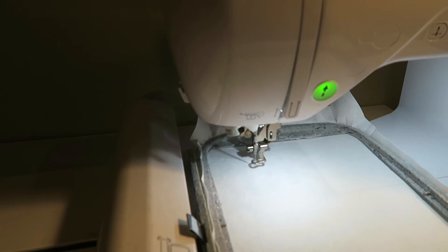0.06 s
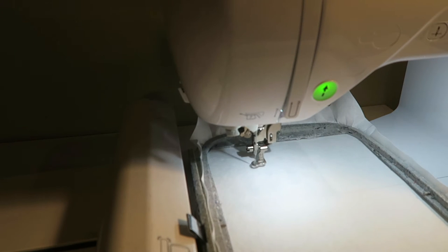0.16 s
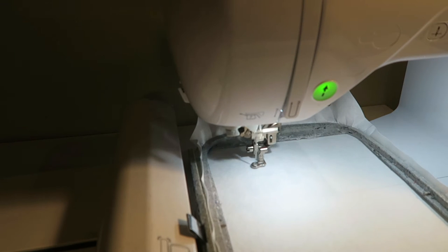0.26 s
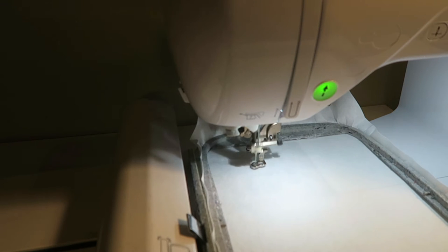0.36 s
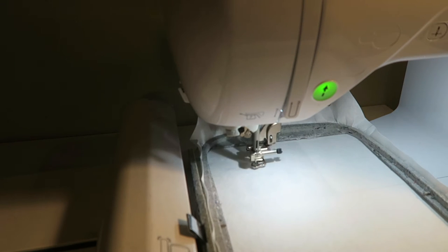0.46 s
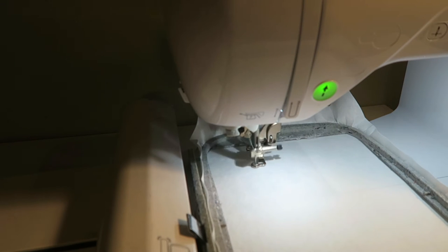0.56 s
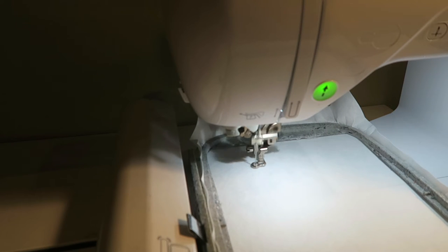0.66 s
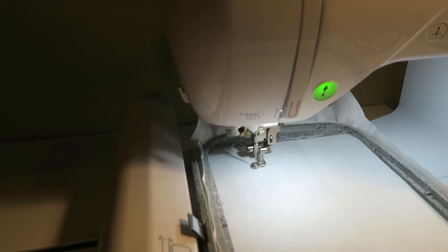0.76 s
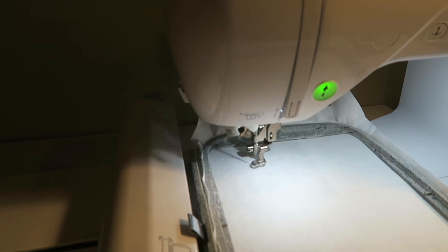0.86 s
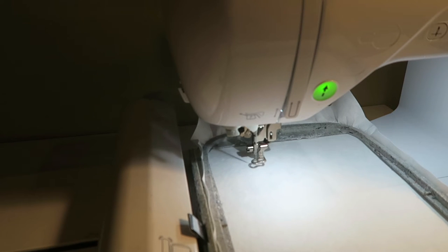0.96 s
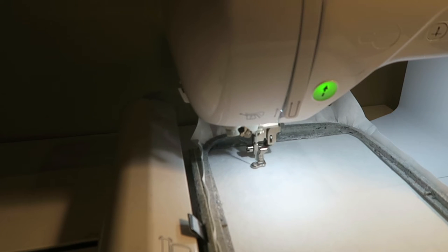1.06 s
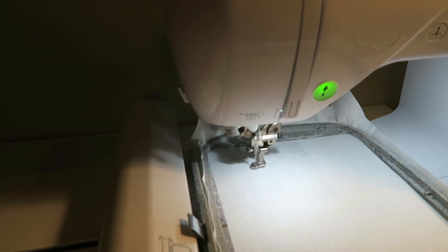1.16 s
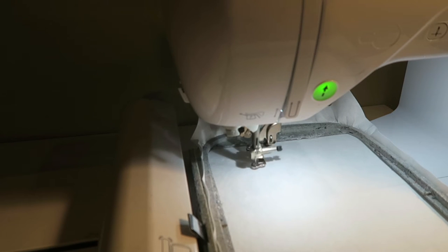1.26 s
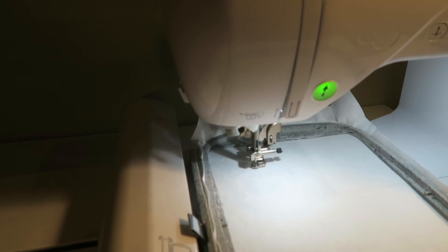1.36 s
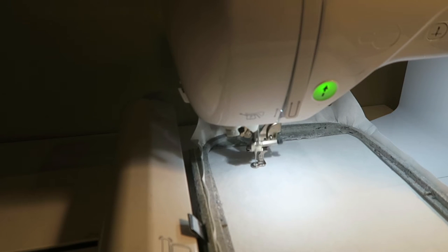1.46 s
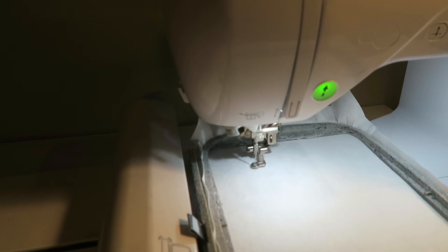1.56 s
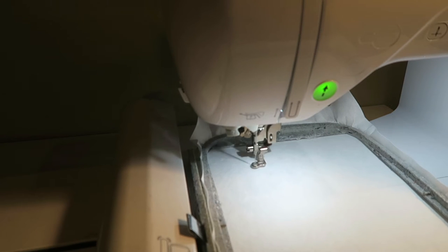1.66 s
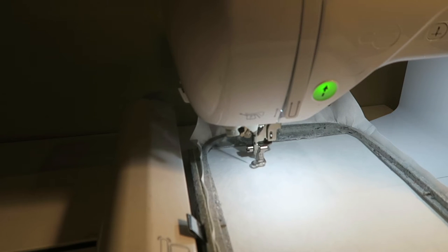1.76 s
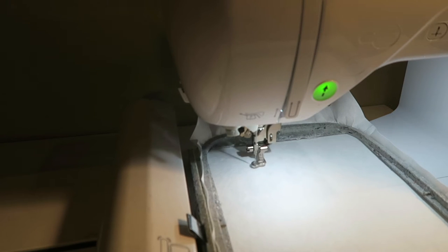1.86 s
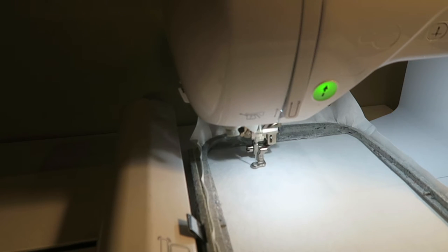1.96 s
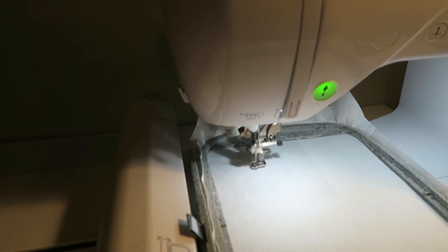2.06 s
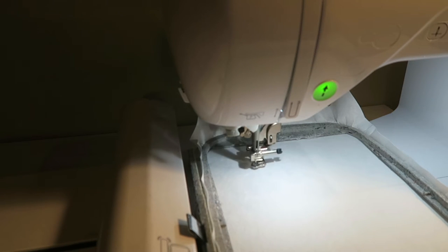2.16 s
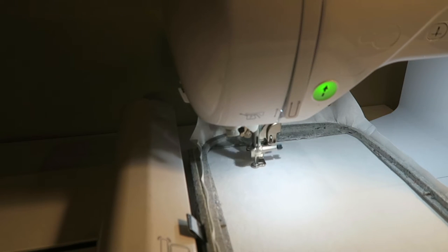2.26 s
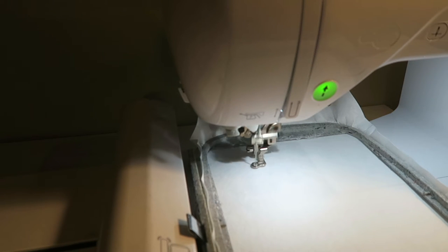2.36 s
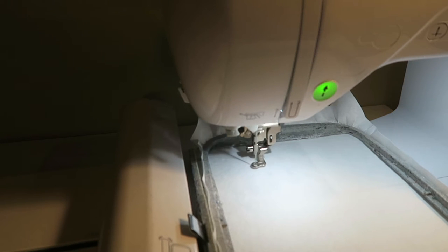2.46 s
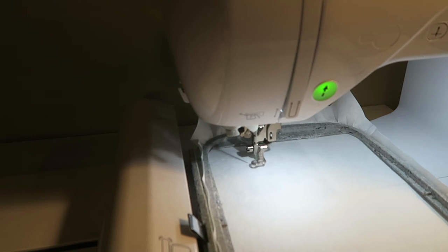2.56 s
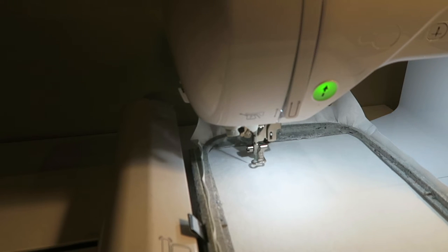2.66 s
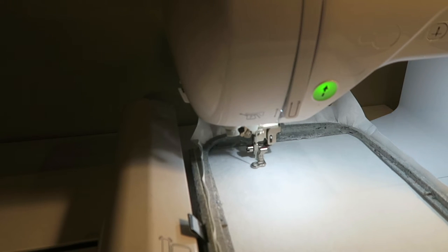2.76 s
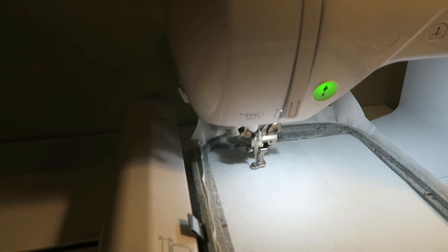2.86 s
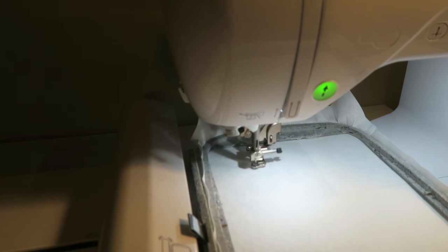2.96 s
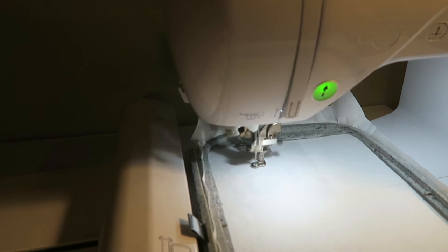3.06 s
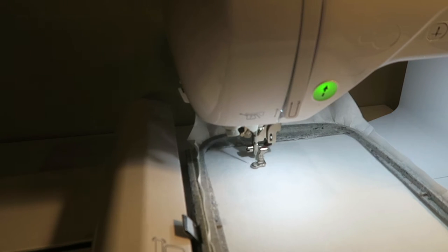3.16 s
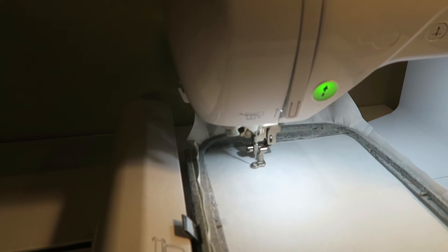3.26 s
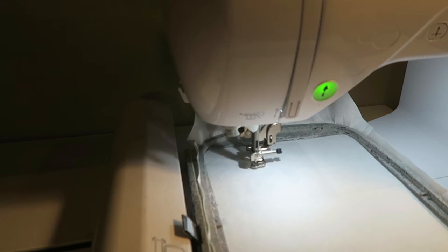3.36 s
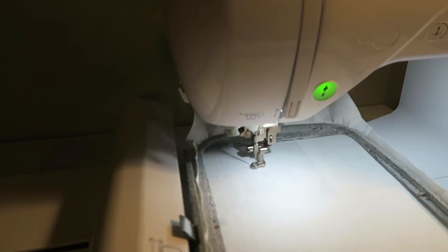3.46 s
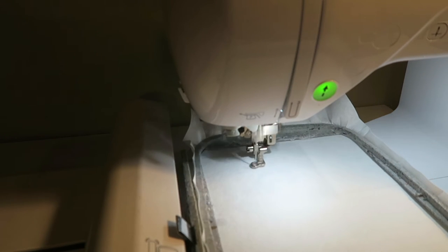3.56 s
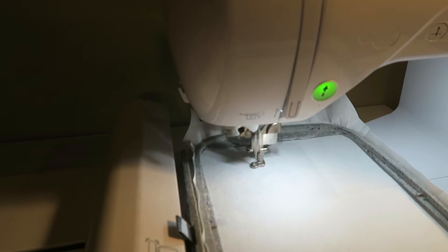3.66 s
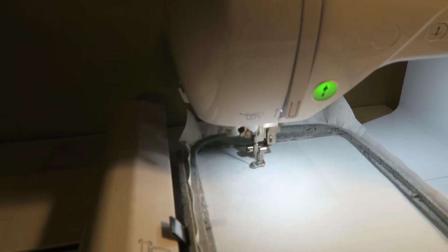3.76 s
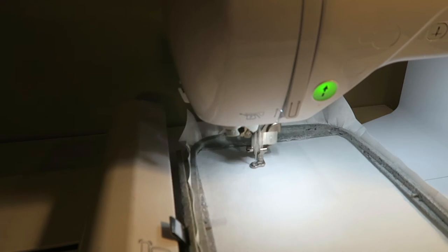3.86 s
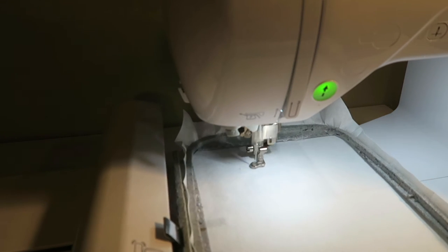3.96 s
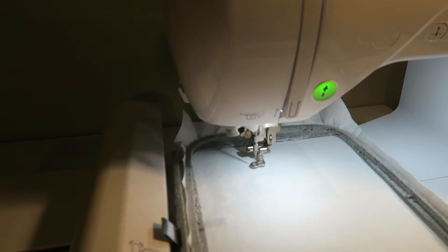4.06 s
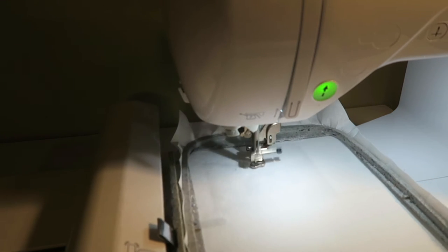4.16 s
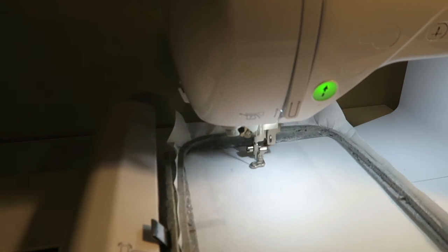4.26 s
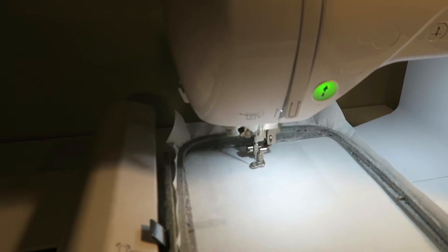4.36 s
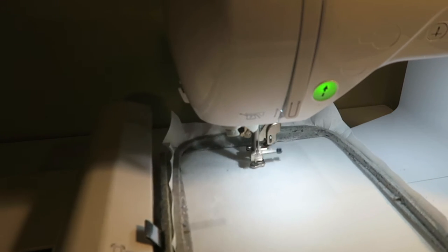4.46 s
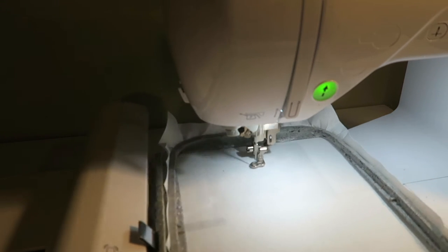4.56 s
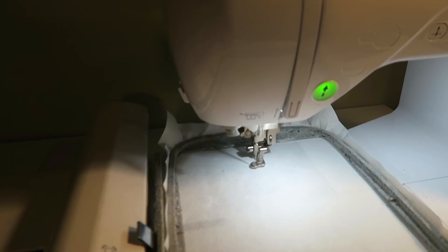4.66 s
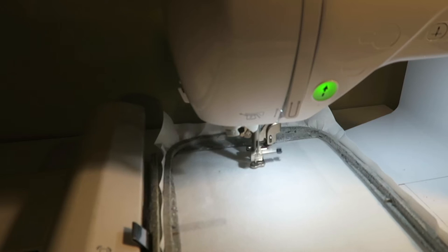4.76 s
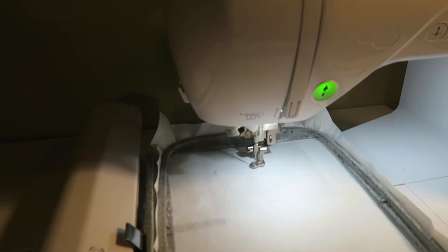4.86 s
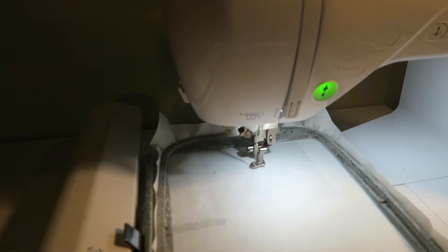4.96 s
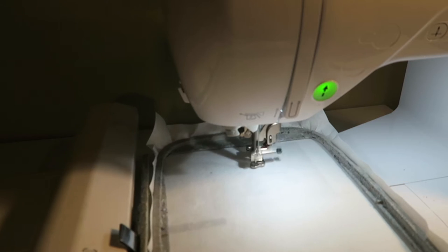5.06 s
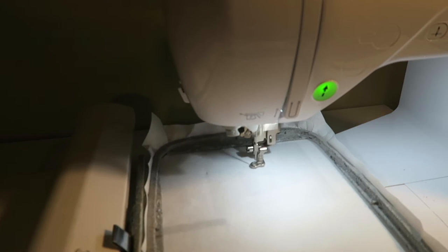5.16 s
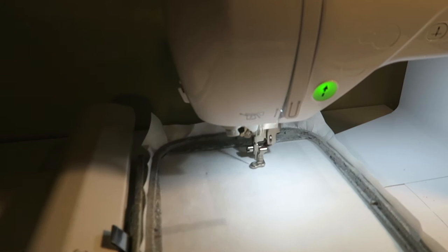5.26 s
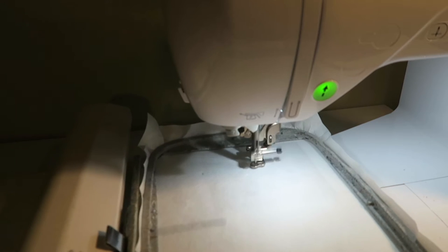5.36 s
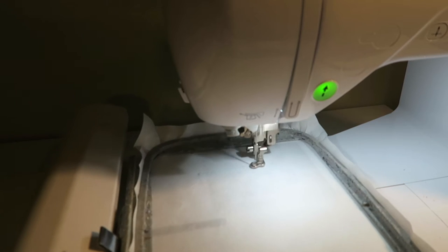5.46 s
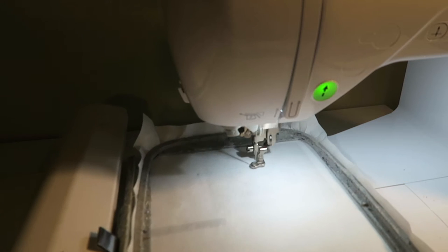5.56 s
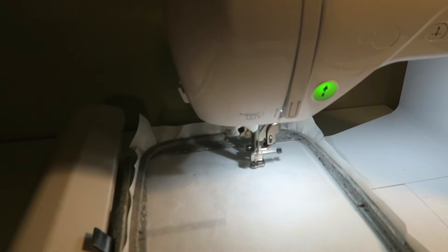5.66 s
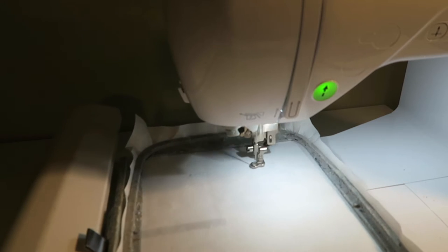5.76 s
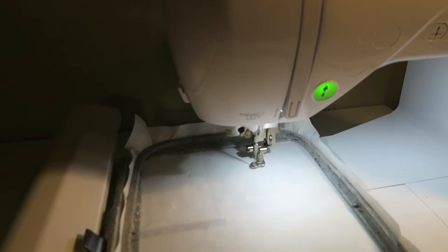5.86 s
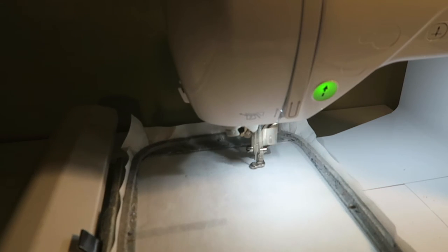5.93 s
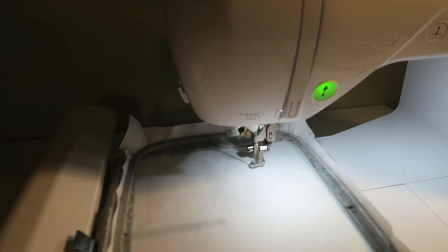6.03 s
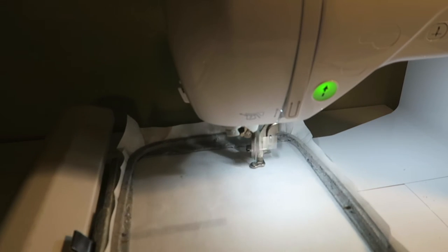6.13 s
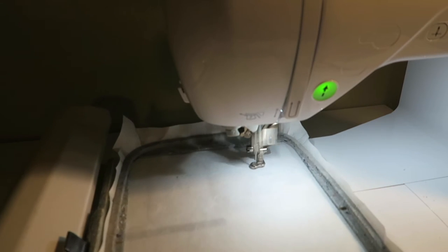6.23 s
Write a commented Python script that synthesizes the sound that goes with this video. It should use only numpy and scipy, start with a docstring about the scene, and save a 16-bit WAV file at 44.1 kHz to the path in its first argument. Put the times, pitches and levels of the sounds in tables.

```python
"""An embroidery machine, close by in a small room: four slow stitches, then it speeds up to an even run.
At each stitch the hoop carriage jerks off and jolts to a stop; these impacts excite the modes of the
casing and the table and rattle loose parts, while the carriage motor hums. Thread swishes by friction
and snaps tight, the steel hook clinks and small parts tick. Underneath, the shaft motor whirs, and it
whines as it gathers speed."""
import sys
import numpy as np
from scipy import signal
from scipy.fft import rfft, irfft, next_fast_len
from scipy.io import wavfile
from scipy.ndimage import uniform_filter1d

SR = 44100
rng = np.random.default_rng(int(sys.argv[2]) if len(sys.argv) > 2 else 0)


def persist_wave(psi):
    """Save psi, clipped to +-1, as 16-bit WAV."""
    counts = np.round(np.clip(psi, -1, 1) * 32767).astype(np.int16)
    wavfile.write(sys.argv[1], SR, np.atleast_2d(counts).T)


N = 277609

# Carriage strokes, one a shaft turn: (start [s], jerk level [dB], travel time [s], jolt level [dB])
STITCHES = [(-0.04, 3, 0.032, -18.5), (0.806, 4.5, 0.032, -20.5), (1.658, 3.5, 0.028, -21.5),
            (2.506, 5, 0.03, -19), (3.213, -1.5, 0.063, -8.5), (3.544, 0, 0.065, -9.5),
            (3.782, -1, 0.058, -9), (3.978, -3, 0.059, -13.5), (4.146, -3, 0.055, -14.5),
            (4.303, -5.5, 0.059, -13.5), (4.455, -5, 0.051, -20.5), (4.6, -8, 0.059, -14.5),
            (4.753, -6.5, 0.061, -13.5), (4.9, -6.5, 0.058, -12), (5.053, -6, 0.06, -18.5),
            (5.202, -6, 0.056, -18), (5.352, -5.5, 0.062, -14.5), (5.504, -5, 0.055, -17),
            (5.654, -2.5, 0.055, -16.5), (5.801, -4.5, 0.062, -15), (5.95, -3.5, 0.058, -16.5),
            (6.102, -3.5, 0.053, -15.5), (6.253, -6, 0.054, 0)]
# Spectrum of loose parts rattling in the casing: (frequency [Hz], relative level [dB])
RATTLE_SPECTRUM = [(18, -56), (30, -16.5), (114, -4), (156, -2.5), (213, 0.5), (359, -0.5), (432, 4),
                   (1170, -11), (1290, -13), (1820, -23), (4090, -31.5), (12300, -66.5), (15500, -105)]
# Stitch rates: slow, table thump at its fullest, jerk and jolt start to blur together, fast
SLOW_PER_S, THUMP_PER_S, BLUR_PER_S, FAST_PER_S = 1.17, 2.8, 4.5, 6.67


def carriage():
    """Inertia: loose parts rattle against the casing as the carriage jerks off and jolts to a stop."""
    bass_env, treble_env, hiss_env = np.zeros((3, N))
    t = np.arange(N) / SR
    for (start, jerk_db, travel, jolt_db), period in zip(STITCHES, turns()[1]):
        rate, stop = 1 / period, start + travel
        rise = by_speed((.009, .003), rate)
        settling = undb(-60 * np.clip(t - stop - .022, 0, None) / 1.3)
        jerk = burst(start - .004, rise + .00016, by_blur((.22, .67), rate)) * settling
        bass_env += undb(jerk_db) * jerk
        # belt slack is taken up with a clack; at speed the treble of the jerk comes late
        clack = by_speed((.51, .067), rate) * burst(start, rise, .11)
        lag = by_blur((0, .007), rate)
        treble_env += undb(jerk_db - 27.5) * (np.roll(jerk, int(lag * SR)) + clack)
        hiss_env += undb(jerk_db - 12.5) * burst(start - .003 + lag, rise, by_speed((.15, .2), rate))
        # the treble of the jolt starts just ahead of the stop
        t60, lead = by_speed((.16, .066), rate), by_blur((.012, .02), rate)
        bass_env += undb(jolt_db) * burst(stop - .003, .005, t60, hold=.024)
        shaken = burst(stop - lead, .01, t60, hold=lead + .0058)
        shaken *= undb(jolt_db + by_blur((-19.5, -19), rate))
        treble_env += shaken
        hiss_env += undb(by_blur((-5, -2), rate)) * shaken
    bass = lowpass(bass_env * grit(scatter_db=-1.5, rate_hz=380), 1100)
    grains = grit(scatter_db=2.6, rate_hz=500)
    treble = lowpass(highpass(treble_env * grains, 1820), 8200) + highpass(hiss_env * grains, 8200)
    force = colour(undb(-12) * bass + undb(23.5) * treble, RATTLE_SPECTRUM)
    body = casing(force, direct_db=-1.98)
    return undb(by_thump((-22, -3.5), speed())) * lowpass(body, 195) + highpass(body, 195)


def knocks():
    """Impact excitation: jerks and stops ring casing and table and click steel; at speed a lever taps."""
    # Resonances of the table: (frequency [Hz], level [dB], T60 [s])
    table_modes = [(53.3, -3, 0.22), (96, -4, 0.093), (121.4, -0.5, 0.16)]
    blows, table_force, clicks, taps = np.zeros((4, N + 400))
    t = np.arange(400) / SR
    for (start, jerk_db, travel, jolt_db), period in zip(STITCHES, turns()[1]):
        rate, stop = 1 / period, start + travel
        contact_s = by_blur((.0009, .0022), rate)  # longer, so softer, once the strokes blur
        push, thud = np.sin(np.pi * np.clip(t / contact_s, 0, 1)) ** 2, np.hanning(60)
        strike(blows, start + .003, jerk_db + by_blur((0, -3), rate), push)
        strike(blows, stop + by_blur((.0105, .013), rate), jolt_db + 17.5, push)
        strike(table_force, start + .00189, jerk_db + by_thump((1, 8), rate), thud)
        rebound = stop + by_blur((.011, .03), rate)
        strike(table_force, rebound, jolt_db + by_speed((11, 18.5), rate), thud)
        click_pair = burst(start - .002, .00068, .03) + burst(stop + .004, .0022, .03)
        clicks[:N] += undb(jerk_db + by_blur((-28.5, -35), rate)) * click_pair
        if rate > BLUR_PER_S:
            taps[:N] += undb(-14) * burst(start + .905 * period, .0019, .052)
    noise = rng.standard_normal(N + 400)
    knock = highpass(casing(blows, direct_db=-52), 207)
    boom = lowpass(resonate(table_force, table_modes), 170)
    click = lowpass(highpass(clicks * noise, 1800), 6000)
    lever = butter(taps * noise, (650, 1400), "band")
    return (knock + boom + click + lever)[:N]


def casing(force, direct_db):
    """Modal superposition: the plastic shell passes a force on and adds its own resonances."""
    # Resonances of the shell: (frequency [Hz], level [dB], T60 [s])
    shell_modes = [(55.6, -20, 0.19), (120, -3, 0.25), (201, -1, 0.14), (224, -3, 0.16), (250, -9.5, 0.12),
                   (330, -11, 0.05), (436, -6, 0.12), (530, -6, 0.12), (651.5, -5, 0.09), (807, -7.5, 0.09),
                   (940, -10, 0.07), (1290, -3.5, 0.07), (1500, -9.5, 0.044), (2020, -3.5, 0.07),
                   (2500, -2, 0.05), (3350, -1.5, 0.04), (4020, -0.5, 0.05), (6200, 0, 0.01)]
    return undb(direct_db) * force + resonate(force, shell_modes)


def stepper():
    """Forced vibration: the carriage motor hums at its step rate; then the hoop sways at its own note."""
    # Harmonics of the step rate: (frequency [Hz], level [dB])
    harmonics = [(219, -3.5), (438, -6)]
    sway_hz, pitch_spread = 212, .015
    t, out = np.arange(N) / SR, np.zeros(N)
    draws = rng.standard_normal((len(STITCHES), 2))
    for (start, _, travel, jolt_db), (draw, phase), period in zip(STITCHES, draws, turns()[1]):
        rate, stop, detune = 1 / period, start + travel, pitch_spread * draw
        hum = sum(undb(db) * np.sin(2 * np.pi * (hz * (1 + detune) * t + phase)) for hz, db in harmonics)
        moving = undb(by_blur((-24.5, -20.5), rate)) * burst(start + .0018, .013, .07, hold=travel)
        braking = undb(jolt_db + by_speed((-9, -3), rate)) * burst(stop - .005, .014, .16, hold=.0051)
        swaying = undb(by_speed((-27, -24.5), rate)) * burst(stop + .038, .039, .13, hold=.037)
        hoop_note = np.sin(2 * np.pi * (sway_hz * (1 + 2 * detune) * t + phase))
        out += (moving + braking) * hum + swaying * hoop_note
    return out


def thread():
    """Friction and tension: thread rubs through its guides; at speed it also snaps tight once a turn."""
    # Friction noise of the thread: (frequency [Hz], relative level [dB])
    friction_spectrum = [(800, 7.5), (2000, -19.5), (4000, -7), (7000, -11), (11000, -20), (15500, -26)]
    # Dry cracks of the tightening thread: (time [s], level [dB])
    snaps = [(3.836, -16), (4.0262, -19.5), (4.2294, -14), (4.376, -28), (4.526, -13), (4.6752, -31),
             (4.826, -38), (4.9769, -18), (5.1264, -44), (5.2772, -44), (5.427, -25), (5.5764, -28),
             (5.727, -15), (5.878, -17), (6.0269, -20), (6.176, -22)]
    pull = np.zeros(N)
    for (start, _, travel, _), period in zip(STITCHES, turns()[1]):
        swell = burst(start + .003, .043, .086, hold=max(travel - .025, 0))
        pull += undb(by_blur((-41, -28.5), 1 / period)) * swell
    swish = colour(pull * grit(scatter_db=4.5, rate_hz=400), friction_spectrum)
    snap_env = sum(undb(db) * burst(at, 0, .007) for at, db in snaps)
    cracks = lowpass(highpass(snap_env * np.sign(rng.standard_normal(N)), 2000), 7300)
    # the needle bar clacks just before each snap
    clack_env = sum(undb(db + 3.5) * burst(at - .012, .0093, .043) for at, db in snaps)
    return swish + cracks + ring(clack_env * rng.standard_normal(N), hz=2550, t60=.0041)


def hook():
    """Steel resonance: the rotary hook clinks in its race and chatters after stops, harder at speed."""
    # Clinks that ring the steel hook, twice a turn at speed, one of them struck by the cam: (time [s], level
    # [dB])
    contacts = [(3.6092, -38), (3.7162, -27), (3.837, -17), (3.922, -27), (4.024, -41), (4.0996, -25.5),
                (4.194, -13.5), (4.2563, -30), (4.346, -36), (4.4094, -34), (4.4907, -20), (4.5575, -39),
                (4.6423, -24), (4.7097, -38), (4.797, -37), (4.848, -24.5), (4.9428, -19), (5.009, -52),
                (5.0843, -42), (5.1594, -39), (5.2405, -22), (5.312, -30), (5.386, -25), (5.4595, -30),
                (5.544, -23), (5.607, -25.5), (5.687, -25), (5.76, -27), (5.8458, -17), (5.908, -33),
                (5.99, -24), (6.0571, -32), (6.1403, -18), (6.2074, -42)]
    # Resonances of the hook: (frequency [Hz], level [dB], T60 [s])
    hook_modes = [(3400, -6, 0.025), (4020, 4, 0.025), (4310, -1, .02), (4820, -8, 0.02)]
    chatter = sum(burst(start + travel + .04, .011, .48) for start, _, travel, _ in STITCHES)
    clinks = sum(undb(db + 6) * burst(at, .00092, .071) for at, db in contacts)
    envelope = undb(-34.5) * speed() / FAST_PER_S * chatter + clinks
    return resonate(envelope * grit(scatter_db=1.5, rate_hz=120), hook_modes)


def ticks():
    """Free vibration: light impacts ring small steel parts; a cam pings and shakes loose parts."""
    # Impacts of small parts: (time [s], level [dB], band centre [Hz], relative treble level [dB])
    part_ticks = [(0.0996, -41.5, 5500, -5), (0.3921, -17, 3000, -13), (0.394, -14, 1250, -30),
                  (0.938, -47, 8500, -18), (0.952, -33.5, 3600, -12), (0.9905, -50, 5500, -4),
                  (1.0755, -50.5, 5560, 0), (1.166, -23, 1680, -40), (1.2794, -52, 6800, -18),
                  (1.7977, -23, 1650, -15), (1.956, -30.5, 1460, -31), (2.422, -24, 1300, -24),
                  (2.6425, -33.5, 4060, -9), (2.658, -24.5, 3520, -28), (2.793, -31, 2140, -24),
                  (2.945, -26, 1340, -24), (3.022, -33, 1460, -31), (3.111, -36, 1660, -10),
                  (3.179, -36, 1310, -16), (3.3976, -17, 2920, -16), (3.6681, -10.5, 1860, -20.5),
                  (3.884, -31.5, 2950, 1)]
    # Resonances of the steel parts: (frequency [Hz], level [dB], T60 [s])
    steel_modes = [(3400, 12, 0.012), (4030, 8, 0.016), (5090, 4, 0.012), (6760, 0, 0.012)]
    # Cam pings while the shaft gathers speed: (time [s], level [dB])
    early_pings = [(2.3231, -22.5), (2.358, -43), (2.4374, -20.5), (2.4668, -22), (2.7911, -30),
                   (3.1092, -22), (3.18, -22), (3.3414, -14.5), (3.6696, -16)]
    cam_from_s, cam_turn_share, ping_hz = 3.5, .72, 566  # at speed the cam strikes once a turn
    cam_times = [start + cam_turn_share * period for start, period in zip(*turns()) if start > cam_from_s]
    tick_scatter_db, ping_scatter_db = 2 * rng.standard_normal((len(cam_times), 2)).T
    impacts = [(at, db - 45, 2200, 2.5) for at, db in zip(cam_times, tick_scatter_db)] + part_ticks
    ping_db = np.interp(cam_times, (cam_from_s, STITCHES[9][0]), (-15, -21)) + ping_scatter_db
    dull, bright, cam_force = np.zeros((3, N + SR))
    t = np.arange(4000) / SR
    decay = undb(-60 * t / .031) + .095 * undb(-60 * t / .23)
    crack_env = undb(-1.5) * np.clip(t / .0016, 0, 1) * decay
    for at, db, hz, treble_db in impacts:
        crack = crack_env * rng.standard_normal(len(t))
        strike(dull, at, db, butter(crack, (hz / 1.4, hz * 1.4), "band"))
        strike(bright, at, db + treble_db, crack)
    bright = butter(bright, (1200, 8000), "band")
    ping, shake = np.hanning(500) * np.sin(2 * np.pi * ping_hz * t[:500]), np.zeros(N)
    for at, db in list(zip(cam_times, ping_db)) + early_pings:
        strike(cam_force, at, db, ping)
        shake += undb(db - 6) * burst(at - .004, .0048, .23)
    rattle = colour(shake * grit(scatter_db=2, rate_hz=380), RATTLE_SPECTRUM)
    rustle = highpass(casing(rattle, direct_db=-1), 860)
    ringing = resonate(bright, steel_modes) + ring(cam_force, ping_hz, t60=.045)
    return (dull + bright + ringing)[:N] + rustle


def shaft_motor():
    """Structure-borne sound: belt and gears whir through the casing; a whine climbs with the speed."""
    # Noise of belt and gears: (frequency [Hz], relative level [dB])
    whir_spectrum = [(15, 2), (25, -4.5), (124, -5), (169, -8.5), (192, -14), (231, -8.5), (358, -24),
                     (440, -16), (600, -24), (2360, -43.5), (2680, -40.5), (12000, -66), (15600, -68),
                     (22000, -120)]
    whine_cycles_per_stitch, whine_db = 132, -31.5
    t, rate = np.arange(N) / SR, speed()
    drive = unit(casing(colour(grit(scatter_db=2, rate_hz=54), whir_spectrum), direct_db=0))
    rumble = undb(by_speed((5.5, -11), rate)) * lowpass(drive, 255)
    upper = highpass(drive, 255)
    treble = undb(by_speed((10.5, 6.5), rate)) * highpass(upper, 503)
    whir = undb(by_speed((-44.5, -23.5), rate)) * (rumble + lowpass(upper, 503) + treble)
    waver = unit(uniform_filter1d(rng.standard_normal(N), size=500))
    phase = 2 * np.pi * np.cumsum(whine_cycles_per_stitch * rate * (1 + .018 * waver)) / SR
    fade = np.interp(t, [3.34, 3.39, 3.82, 4.23], [0, 1, 1, 0])  # heard only during the run-up
    return whir + fade * undb(whine_db + 2.2 * waver[::-1]) * np.sqrt(2) * np.sin(phase)


def room(direct, t60=.35):
    """Reverberation: dense reflections decay exponentially; soft furnishings absorb their treble."""
    tail = rng.standard_normal(SR // 2) * undb(-60 * np.arange(SR // 2) / SR / t60)
    return lowpass(signal.fftconvolve(direct, tail / np.linalg.norm(tail))[:N], 1500)


def stereo(mono):
    """Channel differences: direct sound leans a little to one side; scattered sound wavers across."""
    # Scattered sound: (frequency [Hz], side minus mid level [dB])
    scatter = [(60, -33), (200, -27), (700, -19), (2400, -21), (4400, -19), (8000, -10), (15000, -12)]
    # Balance of the direct sound: (frequency [Hz], left minus right level [dB])
    balance = [(60, 0.0), (110, 0.0), (200, 0.0), (380, 1.0), (700, 0.0), (1290, 0.0), (2380, 0.0),
               (4400, 0.0), (8120, 0.0), (15000, 0.0)]
    # Phase of the direct sound: (frequency [Hz], lead of the left channel [rad])
    phase_lead = [(30, 0), (120, 0.08), (340, 0.33), (600, 0.1), (1300, 0), (4000, -.1), (8000, -0.25),
                  (13000, -0.2)]
    size = next_fast_len(N)
    waver = unit(uniform_filter1d(rng.standard_normal(N), size=300))
    side = rfft(mono * waver, size) * undb(on_bins(scatter, size))
    lean = undb(on_bins(balance, size) / 2) * np.exp(.5j * on_bins(phase_lead, size))
    mid = rfft(mono, size)
    return irfft(np.array([mid * lean + side, mid / lean - side]), size)[:, :N]


def turns():
    """Start and period [s] of each shaft turn; the last lasts as long as the one before."""
    starts = np.array(STITCHES)[:, 0]
    return starts, np.append(np.diff(starts), starts[-1] - starts[-2])


def speed():
    """Stitches a second at every sample: the reciprocal of the period."""
    starts, periods = turns()
    return np.interp(np.arange(N) / SR, starts + periods / 2, 1 / periods)


def by_speed(pair, rate):
    """Interpolation of a (slow, fast) pair on a log scale of stitch rate."""
    return np.interp(np.log(rate), np.log([SLOW_PER_S, FAST_PER_S]), pair)


def by_blur(pair, rate):
    """Interpolation that keeps the slow value until the strokes begin to blur."""
    return np.interp(rate, (BLUR_PER_S, FAST_PER_S), pair)


def by_thump(pair, rate):
    """Interpolation that reaches the fast value once the table thumps fully."""
    return np.interp(rate, (SLOW_PER_S, THUMP_PER_S), pair)


def strike(track, at, db, pulse):
    """Superposition: add a pulse in place if its start [s] lies within the scene."""
    if 0 <= at < N / SR:
        i = int(at * SR)
        track[i:i + len(pulse)] += undb(db) * pulse


def burst(at, rise, t60, hold=0):
    """Envelope of a transient: rise, hold and exponential decay, all in seconds."""
    rise, out = max(rise, 1 / SR), np.zeros(N)
    i = np.arange(max(int(at * SR), 0), min(int((at + rise + hold + 2 * t60) * SR), N))
    t = i / SR - at
    out[i] = np.clip(t / rise, 0, 1) ** 2 * undb(-60 * np.clip(t - rise - hold, 0, None) / t60)
    return out


def grit(scatter_db, rate_hz):
    """Random amplitude modulation: noise takes a new level rate_hz times a second."""
    hold = int(SR / rate_hz)
    jumps = np.repeat(rng.standard_normal(N // hold + 1), hold)[:N]
    return unit(rng.standard_normal(N) * undb(scatter_db * uniform_filter1d(jumps, hold)))


def ring(x, hz, t60):
    """Damped resonator: one mode, gain 1 at its centre."""
    r = np.exp(-np.log(1000) / (t60 * SR))
    return 2 * (1 - r) * signal.lfilter([1], [1, -r * np.exp(2j * np.pi * hz / SR)], x).real


def resonate(force, modes):
    """Modal sum: one force drives several damped resonators."""
    return sum(undb(db) * ring(force, hz, t60) for hz, db, t60 in modes)


def colour(x, spectrum, size=16384):
    """Minimum-phase filter of the given spectrum and unit power gain, from the folded cepstrum."""
    cepstrum = irfft(on_bins(spectrum, size) * np.log(10) / 20)
    cepstrum[1:size // 2] *= 2
    cepstrum[size // 2 + 1:] = 0
    response = irfft(np.exp(rfft(cepstrum)))[:size // 4] * np.hanning(size // 2)[size // 4:]
    return signal.fftconvolve(x, response / np.linalg.norm(response))[:N]


def on_bins(points, size):
    """Log-frequency interpolation of (frequency [Hz], value) points onto transform bins."""
    hz, values = np.transpose(points)
    return np.interp(np.log(np.fft.rfftfreq(size, 1 / SR) + 1), np.log(hz), values)


def butter(x, hz, kind):
    """Maximally flat filter with slopes of 12 dB an octave."""
    return signal.sosfilt(signal.butter(2, hz, kind, fs=SR, output="sos"), x)


def lowpass(x, hz):
    """Bass side of a crossover."""
    return butter(x, hz, "low")


def highpass(x, hz):
    """Treble side of a crossover, inverted to meet the bass side in phase."""
    return -butter(x, hz, "high")


def undb(db):
    """Decibels to amplitude ratio."""
    return 10 ** (np.asarray(db) / 20)


def unit(x):
    """Scale to rms 1."""
    return x / np.sqrt(np.mean(x ** 2))


def scene():
    """Superposition: the parts of the machine add up, joined by faint reverberation."""
    direct = carriage() + knocks() + stepper() + thread() + hook() + ticks() + shaft_motor()
    return stereo(direct + undb(-16) * room(direct))


def record(dry):
    """Band limiting and saturation: deep bass is dropped, peaks are rounded, the top treble is cut."""
    rounded = np.tanh(.6 * butter(dry, 36, "high")) / .6
    top_hz = 15560
    return signal.sosfilt(signal.ellip(14, .2, 90, top_hz, fs=SR, output="sos"), rounded)


dry = scene()
out = record(dry)
persist_wave(out)
```